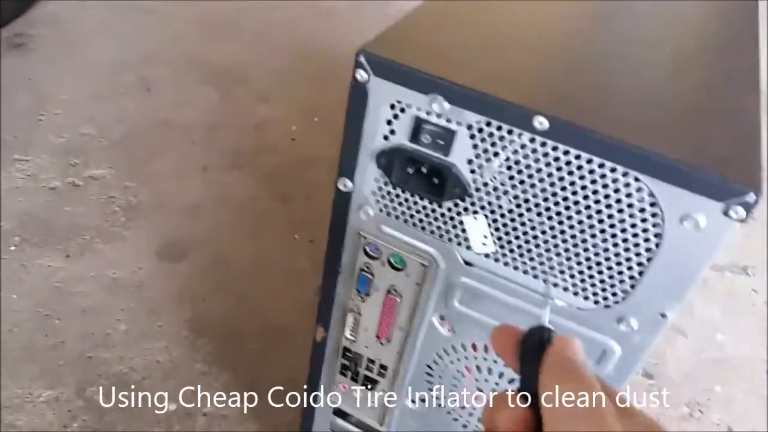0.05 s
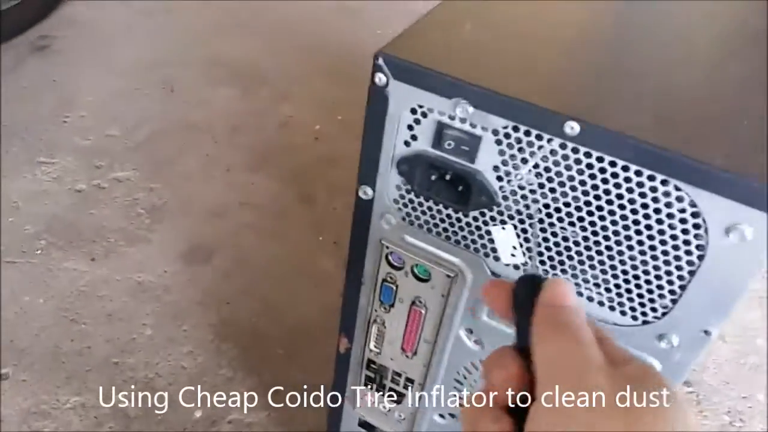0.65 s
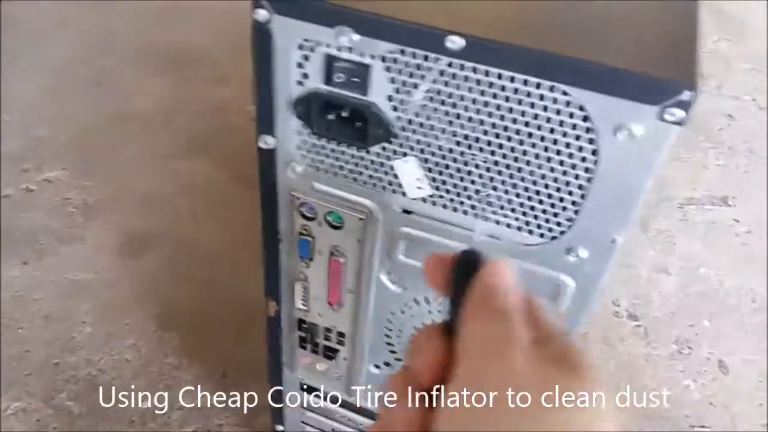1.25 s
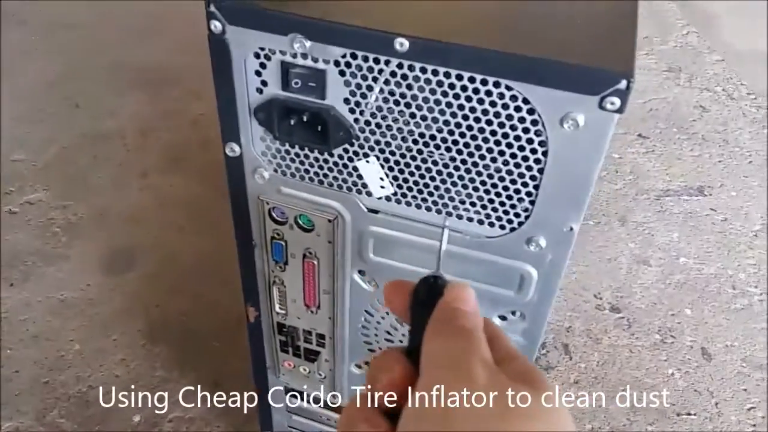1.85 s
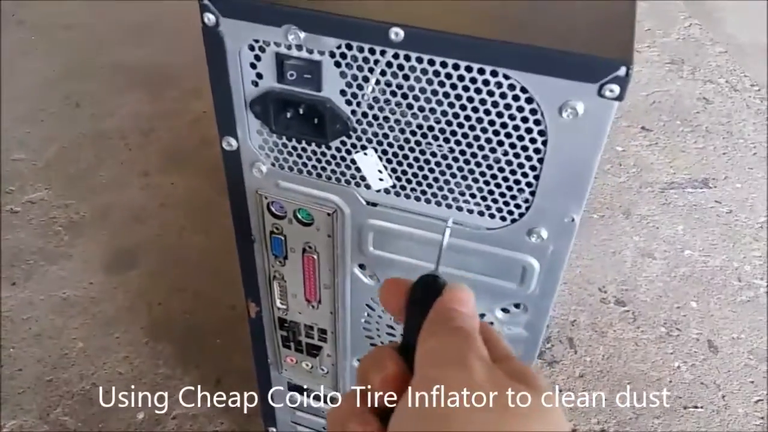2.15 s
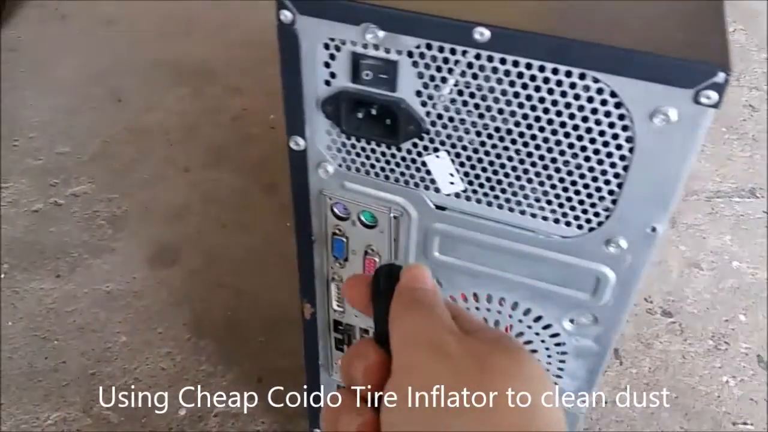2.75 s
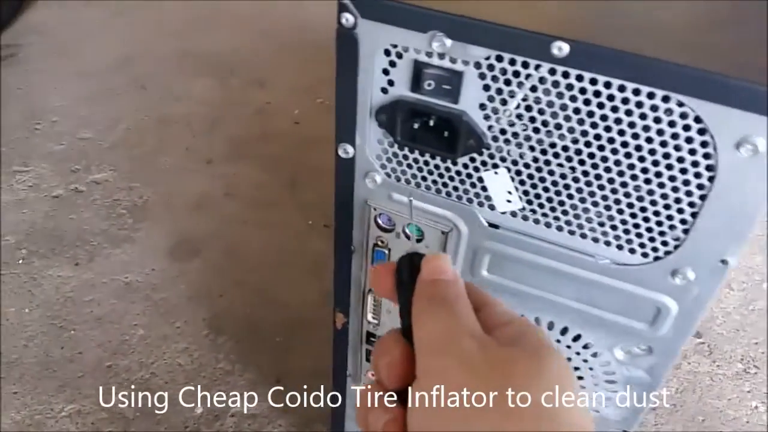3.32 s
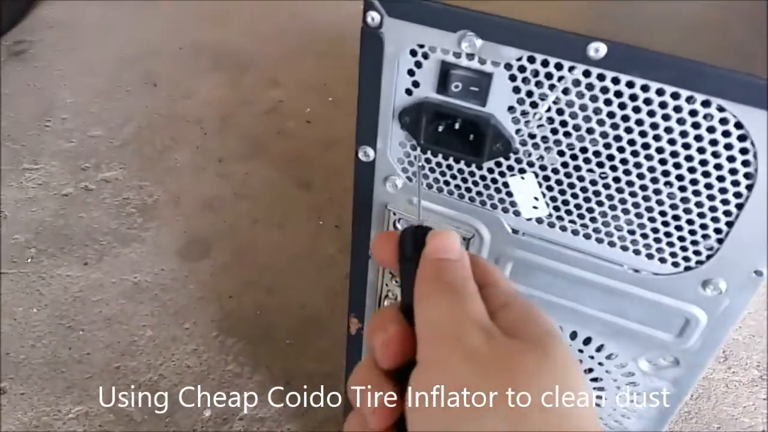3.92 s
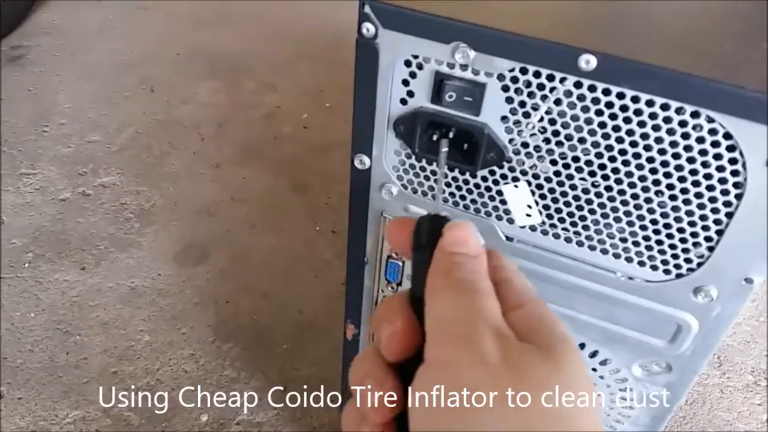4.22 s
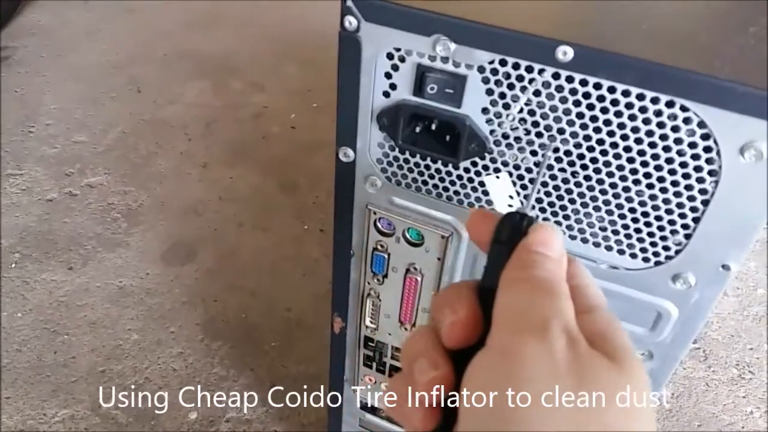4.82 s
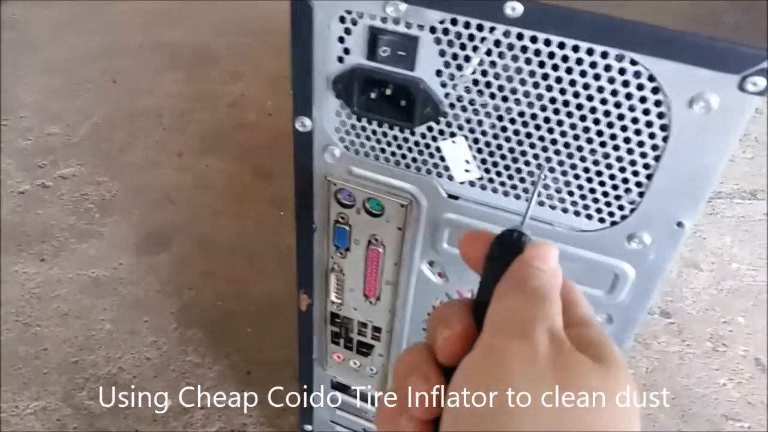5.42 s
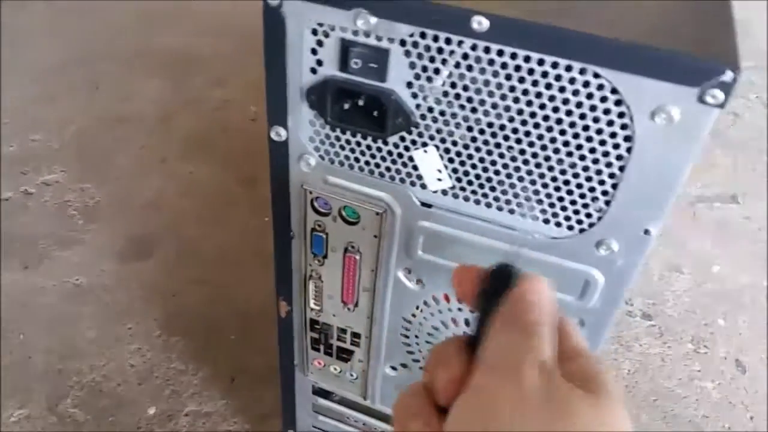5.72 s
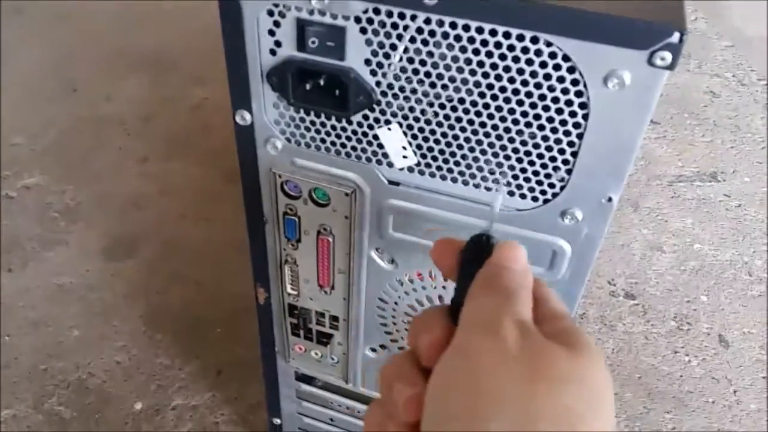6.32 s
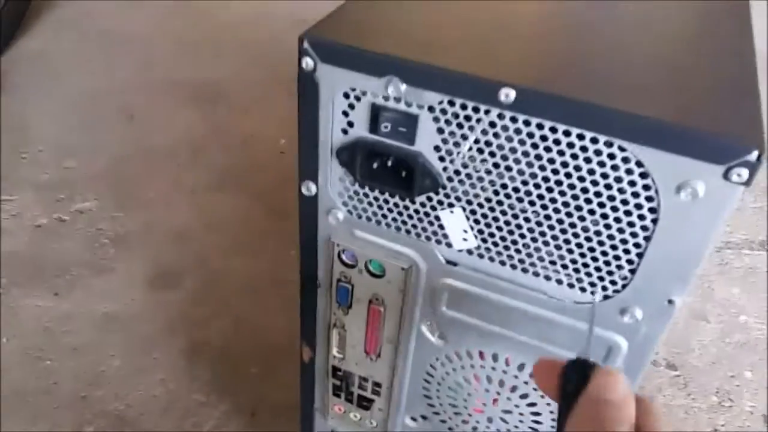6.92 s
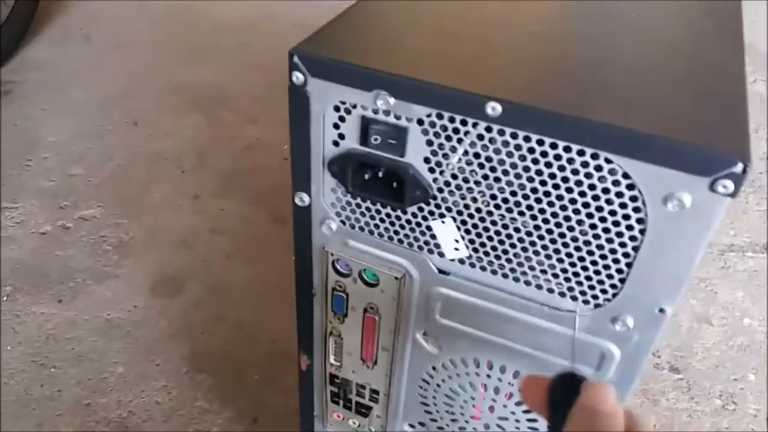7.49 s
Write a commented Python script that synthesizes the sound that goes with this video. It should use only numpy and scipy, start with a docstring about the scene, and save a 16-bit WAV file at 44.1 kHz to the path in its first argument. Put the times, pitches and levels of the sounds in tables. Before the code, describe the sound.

A small piston tire inflator runs without a break on a workshop floor, making a fast knocking buzz with motor whine, rattling gears and ringing plastic panels. Air hisses from its needle nozzle in rapid pulses, blowing dust from a computer case. Midway the jet swells and whistles over the sockets, then eases through the grille. Short whistles return near the end as the pump keeps going.

```python
"""A small piston tyre inflator runs on a workshop floor, its needle nozzle blowing dust from a computer.
From the start, each crank turn gives a low pump stroke, two knocks in the plastic housing and an air puff;
panels ring, the motor whines, gears rattle and another machine hums faintly. Near 1.1 s the knock hardens.
From 3 to 4.7 s the jet swells and whistles over the sockets; near 5.3 s it eases through the grille.
Short whistles return between 6 and 7.4 s; the panels stop at 6.6 s while the pump runs on."""
import sys
import numpy as np
from scipy import signal
from scipy.fft import rfft, irfft, next_fast_len
from scipy.io import wavfile
from scipy.ndimage import uniform_filter1d, map_coordinates

SR = 44100
rng = np.random.default_rng(int(sys.argv[2]) if len(sys.argv) > 2 else 0)


def digitize_waveform(pressure):
    """Quantize a signal to 16-bit integers and store it at the path in sys.argv[1].

    Rows of a 2-D input are taken as channels; values are limited to [-1, 1].
    """
    field = np.atleast_2d(pressure).T
    bounded = np.clip(field, -1, 1)
    quanta = np.round(bounded * 32767).astype(np.int16)
    wavfile.write(sys.argv[1], SR, quanta)


N = 332955
TIME_S = np.arange(N) / SR


def amp(db):
    """Decibels to gain."""
    return 10 ** (np.asarray(db) / 20)


def unit(x):
    """Scale to rms 1."""
    return x / np.sqrt(np.mean(x ** 2) + 1e-20)


def curve(rows):
    """(time [s], value) rows to one value per sample."""
    return np.interp(TIME_S, *np.transpose(rows))


def wobble(rate_hz, hop=128):
    """Smooth random curve, rate_hz knots a second."""
    coarse = np.arange(0, N + hop, hop)
    knots = rng.standard_normal(int(N * rate_hz / SR) + 4)
    return np.interp(np.arange(N), coarse, map_coordinates(knots, [coarse * rate_hz / SR]))


def gate(start_s, end_s, fade_s=0.026):
    """1 between two times, soft edges."""
    return np.clip(np.minimum(TIME_S - start_s, end_s - TIME_S) / fade_s + .5, 0, 1)


def arch(start_s, end_s):
    """Half-sine swell between two times."""
    return np.sin(np.pi * np.clip((TIME_S - start_s) / (end_s - start_s), 0, 1))


def filtered(x, response):
    """Apply a complex frequency response."""
    size = next_fast_len(N + SR // 2)
    return irfft(rfft(x, size) * response(np.fft.rfftfreq(size, 1 / SR)), size)[:N]


def narrow(x, hz, width_hz):
    """One resonance driven by x, rms 1."""
    return unit(signal.lfilter(*signal.iirpeak(hz, hz / width_hz, SR), x))


def noise(spectrum):
    """Noise of rms 1 shaped by (frequency [Hz], level [dB]) rows."""
    hz, db = np.transpose(spectrum)
    response = lambda f: amp(np.interp(np.log(f + 1), np.log(hz), db, -120, -120))
    return unit(filtered(rng.standard_normal(N), response))


def cyclic(turns, shape, depth):
    """Gain of rms 1, repeating every crank turn."""
    angle, db = np.transpose(shape)
    return unit(amp(depth * np.interp(turns, angle, db, period=1)))


def patchy(x, depth_db):
    """Narrow bands swell and fade over tenths of a second; rms 1."""
    bands = signal.stft(x, nperseg=1024)[2]
    ripple = uniform_filter1d(rng.standard_normal(bands.shape), size=3, axis=0)
    ripple = unit(uniform_filter1d(ripple, size=26, axis=1))
    return unit(signal.istft(bands * amp(depth_db * ripple), nperseg=1024)[1][:N])


# Crank speed (time [s], speed [turns/s])
CRANK_HZ = [(0, 59.58), (.6, 59.537), (3.4, 59.905), (4.3, 59.859), (4.7, 60.004), (7.55, 60.159)]
def crank():
    """Crank angle in turns; the speed creeps up as the motor warms."""
    return .15 + np.cumsum(curve(CRANK_HZ)) / SR


# Stroke harmonics (order [x crank speed], base level [dB])
STROKE_DB = [(1, -43), (2, -34), (3, -55), (4, -35), (5, -45), (6, -42), (7, -32), (8, -39), (9, -33.5),
             (10, -30), (11, -26.5), (12, -32.5), (13, -33), (14, -44.5), (15, -66), (16, -36.5), (17, -32),
             (18, -50)]
# Shift towards harmonic 10, away from 11 (time [s], shift [dB])
BALANCE_DB = [(0, 4.5), (1.7, -0.6), (5, -1.5), (7.55, -0.7)]
def pump(turns, scatter_rad=0.48, waver_db=1.0, crest_turns=.635):
    """Compression stroke: low harmonics crest together once a turn."""
    balance_db = curve(BALANCE_DB)
    shift_db = {10: balance_db, 11: -balance_db}
    angle_rad = 2 * np.pi * (turns - crest_turns)
    stroke = np.zeros(N)
    for order, db in STROKE_DB:
        level = amp(db + shift_db.get(order, 0) + waver_db * wobble(3.01))
        stroke += level * np.sqrt(2) * np.cos(order * angle_rad + scatter_rad * rng.standard_normal())
    return stroke


# Housing modes (frequency [Hz], width [Hz], gain [dB])
HOUSING_MODES = [(1210, 80, -7.5), (1753, 138, -0.5), (2032, 42, -0.5), (2185, 166, -2), (2465, 470, -5.5),
                 (3040, 113, -7)]
def housing(f):
    """Response of the plastic shell: damped modes of alternating sign."""
    response = 0
    for k, (hz, width_hz, db) in enumerate(HOUSING_MODES):
        damping = 1j * f * width_hz
        response += (-1) ** k * amp(db) * damping / (hz * hz - f * f + damping)
    return response


SETTLE_S, SETTLE_LENGTH_S = 1.1, 0.25
def knocks(turns, strike_turns=.385, jitter_turns=0.00058, scatter_db=1.14):
    """The piston knocks at the end of its travel and rebounds; both blows ring the housing."""
    sample, turn = np.arange(N), np.arange(int(turns[-1]))
    settled = np.clip((TIME_S - SETTLE_S) / SETTLE_LENGTH_S + .5, 0, 1)
    knock_db = -31.5 + 2.5 * settled
    rebound_db = -35.5 + 2.0 * wobble(1.58)
    gap_turns = np.interp(settled, (0, 1), (.098, .14))
    blows = np.zeros(N)
    for db, lag_turns in ((knock_db, 0), (rebound_db, gap_turns)):
        timing, force = rng.standard_normal((len(turn), 2)).T
        at = np.interp(turn + strike_turns + jitter_turns * timing, turns - lag_turns, sample)
        blows += clicks(at, amp(np.interp(at, sample, db) + scatter_db * force))
    period_samples = N / len(turn)
    return period_samples / np.sqrt(2) * filtered(blows, housing)


def clicks(at, size):
    """Band-limited clicks at fractional sample positions."""
    index = np.floor(at)[:, None].astype(int) + np.arange(-7, 9)
    offset = index - at[:, None]
    taps = size[:, None] * np.sinc(offset) * np.cos(np.pi * offset / 16) ** 2
    return np.bincount(np.clip(index, 0, N).ravel(), taps.ravel(), N + 1)[:N]


# Panel ringing (start [s], end [s], frequency [Hz], level [dB])
PANEL_RINGS = [(0, 1.4, 1916, -29), (0, 1.2, 2920, -33), (1.5, 2.7, 2620, -30), (1.52, 4.4, 3052, -34.5),
               (0, 4.6, 1807, -36), (4, 4.6, 2200, -35), (4.65, 6.6, 2173, -32.5), (6.3, 6.6, 2087, -32)]
def panels(knocking, width_hz=30):
    """Loose panels pick up single harmonics of the shaking housing."""
    return sum(gate(start_s, end_s) * amp(db) * narrow(knocking, hz, width_hz)
               for start_s, end_s, hz, db in PANEL_RINGS)


# Four hum tones, then the whine tones (frequency [x crank speed], base level [dB])
HUM_AND_WHINE_DB = [(1.23, -53), (1.85, -53), (2.46, -58), (3.69, -53), (6.73, -39.5), (8.73, -56),
                    (12.73, -46), (14.19, -35.5), (15.19, -74)]
def hum_and_whine(turns, waver_db=2.5, drift_rad=0.1):
    """Faint low hum of another machine (74-221 Hz), under the motor's higher whine."""
    tones = np.zeros(N)
    for ratio, db in HUM_AND_WHINE_DB:
        level = amp(db + waver_db * wobble(4.6))
        tones += level * np.sin(2 * np.pi * ratio * turns + drift_rad * wobble(6.8))
    return np.sqrt(2) * tones


# Low and high rattle spectra (frequency [Hz], relative density [dB])
CLATTER_DB = [(20, -38), (40, -20), (60, -8.5), (130, -10), (290, -10), (350, -8), (410, -1.5), (500, -4.5),
              (650, 0), (850, 2), (1020, 1.5), (1180, -4), (1500, -0.5), (2200, -48)]
RASP_DB = [(900, -43), (1400, -14.5), (1630, 3), (1780, -1), (1900, 0.5), (2250, 2.5), (2450, 0), (2650, 2),
           (2850, -5), (3080, -4.5), (3250, -7), (3500, -28), (4500, -47)]
# Rattle over one turn (angle [turns], relative level [dB])
SHAKE_DB = [(0, -2), (.3, -3.5), (.41, -1.5), (.47, -3), (.56, -5.5), (.68, -3)]
# Brief surges and dips (centre [s], length [s], clatter change [dB])
RATTLE_SURGES = [(0.366, 0.15, 3), (.75, .2, 1.5), (1.01, .18, -2), (1.168, .2, 1.5), (1.36, 0.15, -2.5),
                 (2.57, .14, -2), (3.18, .25, 2), (3.736, 0.3, -2), (4.38, 0.46, -3), (4.848, 0.2, 2),
                 (5.1, .25, -1.5), (5.482, 0.33, -2.5), (5.7, 0.071, 1.5), (5.855, .14, -3),
                 (5.997, .14, 2), (7.288, 0.12, 4.5)]
def rattle(turns, waver_db=0.75, clatter_ease_db_per_s=0.07, rasp_ease_db_per_s=0.01):
    """Loose gears and bearings chatter through each turn, easing a little as the pump runs in."""
    surge_db = sum(db * arch(centre_s - length_s / 2, centre_s + length_s / 2)
                   for centre_s, length_s, db in RATTLE_SURGES)
    surge_db += waver_db * wobble(11)
    clatter_db = -23.5 + surge_db - clatter_ease_db_per_s * TIME_S
    rasp_db = -18 + 0.4 * surge_db + .8 * gate(0, SETTLE_S) - rasp_ease_db_per_s * TIME_S
    clatter = amp(clatter_db) * noise(CLATTER_DB) * cyclic(turns - .06, SHAKE_DB, depth=0.36)
    rasp = amp(rasp_db) * noise(RASP_DB) * cyclic(turns, SHAKE_DB, depth=0.95)
    return clatter + rasp


# Low, middle and top jet spectra (frequency [Hz], relative density [dB])
RUSH_DB = [(2500, -34), (3300, -2.5), (3450, -0.5), (3560, -2), (3720, -0.5), (4020, 2), (4130, 1),
           (4300, 2), (4580, -2), (4850, 0.5), (5300, -9), (5800, -14), (7500, -20.5)]
HISS_DB = [(4500, -25), (5600, -5), (6150, -3.5), (6600, -2), (7050, 2.5), (7650, 0), (7950, 3.5),
           (8400, 1.5), (8700, 4.5), (9100, -1.5), (9400, -3), (11000, -26)]
FIZZ_DB = [(8000, -36), (9600, -4), (10300, 0.5), (11000, 1.5), (11900, 1.5), (12700, -2), (13700, -3.5),
           (15500, -10)]
# Air puff over one turn (angle [turns], relative level [dB])
PUFF_DB = [(.01, -1), (.08, 2), (.24, 4.5), (.36, 2.8), (.54, 3.5), (.85, -2.5)]
# Top band of the jet (time [s], base level [dB])
FIZZ_LEVEL_DB = [(0, -42), (2.8, -42.3), (4.7, -39), (5.3, -39.5), (6.7, -38.5), (7.55, -42)]
# Turbulence, most at the sockets, least through the grille (time [s], level re flat metal [dB])
TURBULENCE_DB = [(0, 0), (2.7, 0), (3.3, 3.5), (4.25, 2), (5.25, -1), (6.1, 0.2), (7.05, 1.4), (7.55, .8)]
def jet(turns, flutter_db=0.85, sputter_db=2.2, sway_db=0.54, fizz_sway_db=0.6):
    """Air leaves the needle in puffs; reflections off the case ripple its spectrum as the hand moves."""
    turbulence_db = curve(TURBULENCE_DB)
    fizz_db = curve(FIZZ_LEVEL_DB) + fizz_sway_db * wobble(9)
    rush = amp(-25.5 + .6 * turbulence_db) * patchy(noise(RUSH_DB), depth_db=1.84)
    hiss = amp(-36.5 + turbulence_db) * patchy(noise(HISS_DB), depth_db=3.0)
    fizz = amp(fizz_db + sputter_db * wobble(900)) * patchy(noise(FIZZ_DB), depth_db=2.3)
    # Higher bands follow the pressure more closely.
    air = rush * cyclic(turns - .05, PUFF_DB, depth=0.36)
    air += hiss * cyclic(turns, PUFF_DB, depth=0.88)
    air += fizz * cyclic(turns, PUFF_DB, depth=1.0)
    return air * amp(flutter_db * wobble(60) + sway_db * wobble(7.6))


# Edge and hollow resonances (start [s], end [s], frequency [Hz], stage width [Hz], crest level [dB])
WHISTLE_BANDS = [(.6, 1.45, 8000, 200, -45), (1.4, 2.8, 8500, 220, -44), (3.1, 3.48, 3750, 550, -21),
                 (3.34, 3.46, 4140, 900, -25), (3.44, 3.6, 11700, 1500, -38),
                 (3.56, 4.06, 5330, 800, -30.5), (3.6, 4.02, 7160, 200, -39), (3.55, 4.02, 8330, 240, -43),
                 (3.86, 4.0, 3580, 500, -25.5), (3.87, 4.0, 7360, 3000, -29),
                 (4.117, 4.35, 3740, 380, -22.5), (4.26, 4.39, 10500, 3000, -39),
                 (4.48, 4.7, 5540, 500, -35.5), (4.48, 4.7, 8350, 400, -36), (5.607, 6.8, 8630, 330, -42.5),
                 (6.0, 6.11, 4300, 900, -26), (6.76, 6.9, 4970, 2500, -29), (7.31, 7.354, 5450, 1100, -27)]
def whistles(turns):
    """Grille edges and socket hollows ring as the nozzle passes, pulsing with the puffs."""
    eddies = rng.standard_normal(N)
    ringing = np.zeros(N)
    for start_s, end_s, hz, width_hz, db in WHISTLE_BANDS:
        band = narrow(narrow(eddies, hz, width_hz), hz, width_hz)
        ringing += arch(start_s, end_s) * amp(db) * band
    return ringing * cyclic(turns, PUFF_DB, depth=1.0)


def scene():
    """Machinery and air, mono."""
    turns = crank()
    knocking = knocks(turns)
    machinery = pump(turns) + knocking + panels(knocking) + hum_and_whine(turns) + rattle(turns)
    return (machinery + jet(turns) + whistles(turns))[None]


def record(dry, cutoff_hz=15720):
    """Round off the highest peaks, then low-pass."""
    rounded = dry[0] / (1 + np.abs(dry[0]) ** 6) ** (1 / 6)
    return filtered(rounded, lambda f: f < cutoff_hz)[None]


dry = scene()
out = record(dry)
digitize_waveform(out)
```